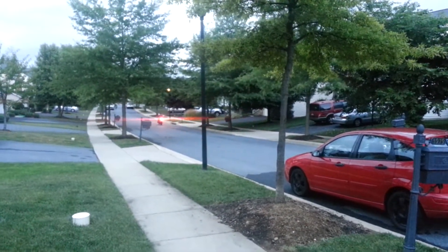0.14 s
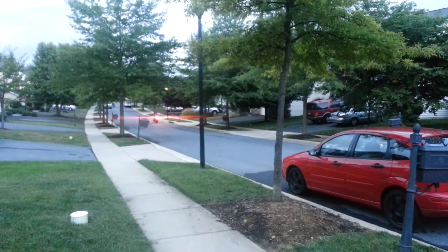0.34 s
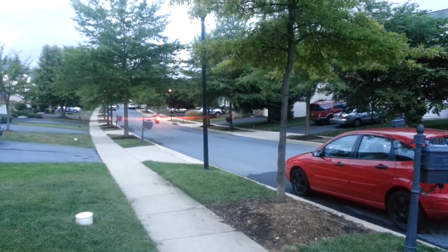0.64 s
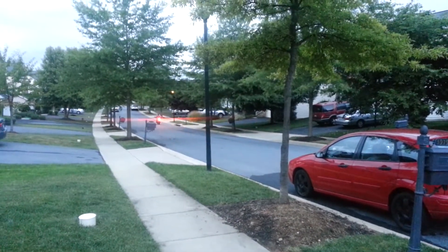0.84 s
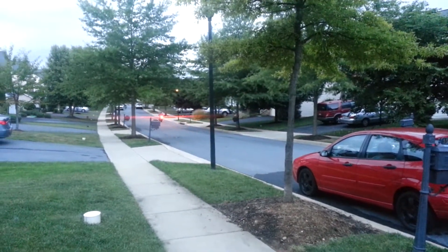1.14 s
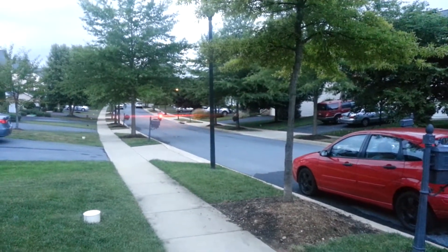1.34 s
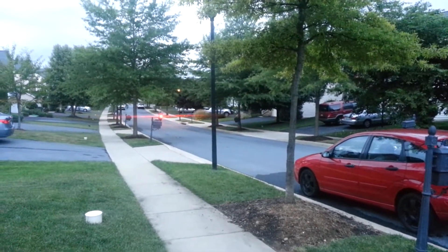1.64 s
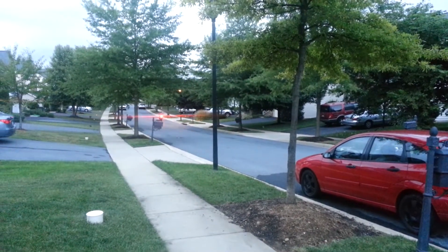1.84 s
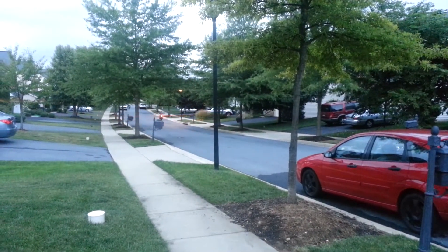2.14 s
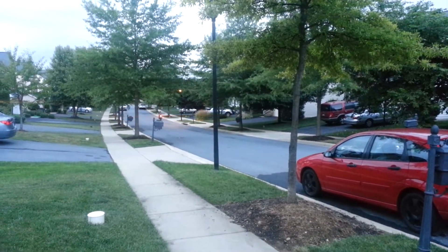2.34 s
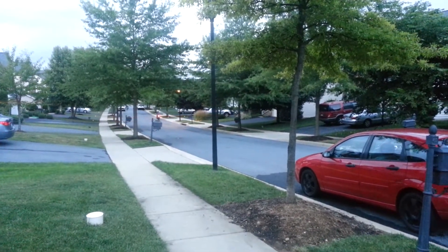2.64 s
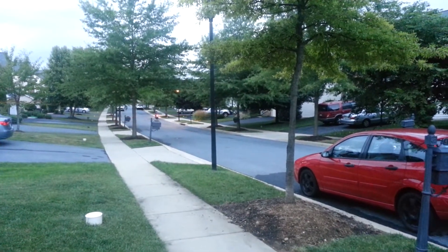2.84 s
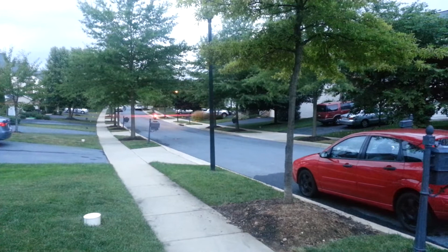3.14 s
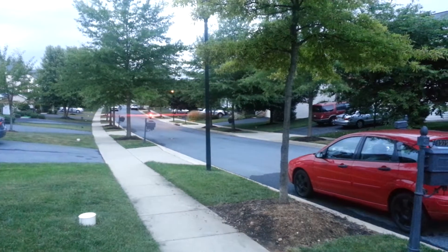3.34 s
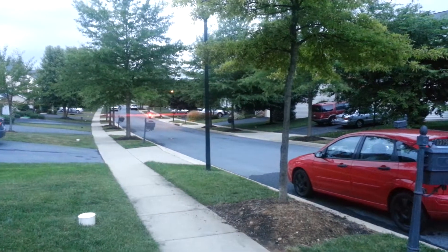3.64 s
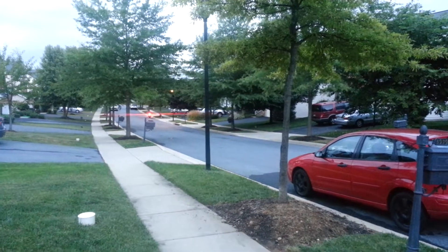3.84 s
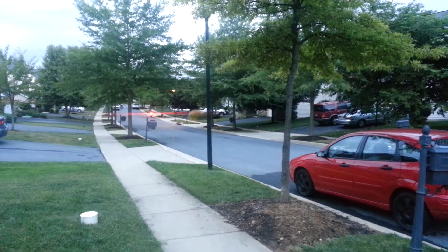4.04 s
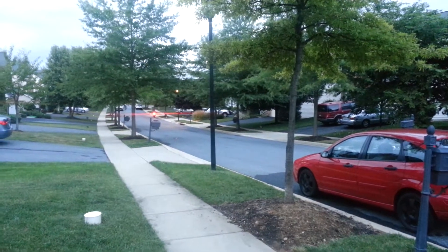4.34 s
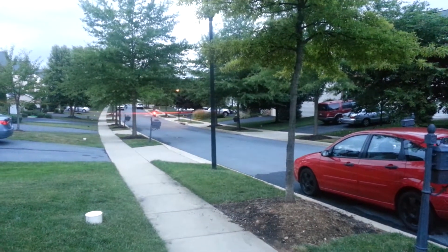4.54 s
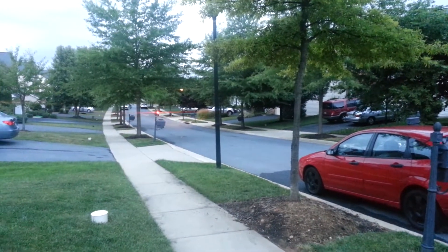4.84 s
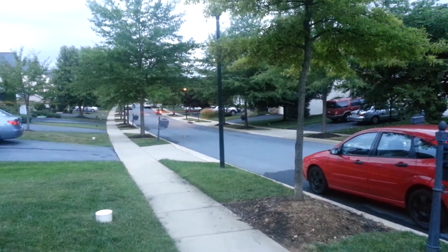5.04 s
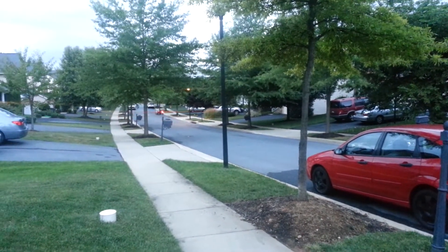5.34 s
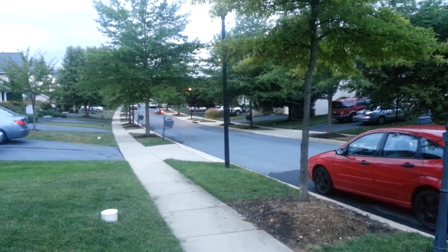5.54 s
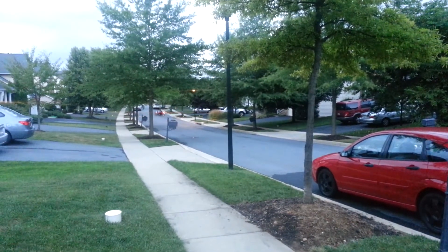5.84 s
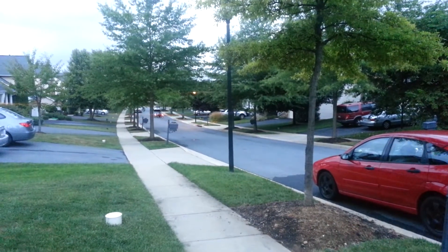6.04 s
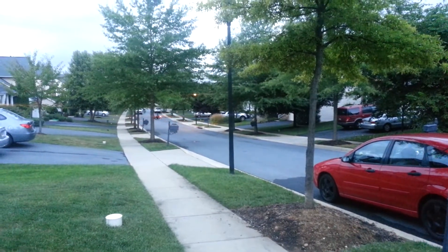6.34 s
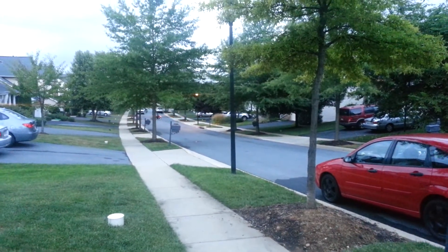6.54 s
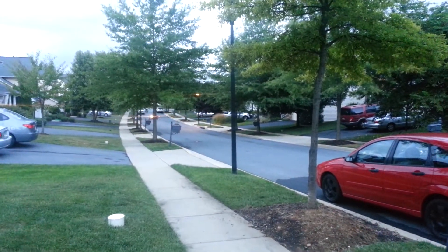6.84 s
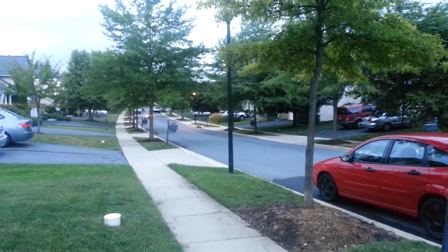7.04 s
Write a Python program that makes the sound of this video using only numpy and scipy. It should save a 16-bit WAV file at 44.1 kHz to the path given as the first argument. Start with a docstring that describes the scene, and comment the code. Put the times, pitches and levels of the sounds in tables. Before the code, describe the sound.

A motorcycle down a quiet street putters and slows, backfires once early on, then is blipped hard with sharp cracking pops over faint insects.

```python
"""Revved V-twin in a quiet street

A motorcycle some way down the street is revved, coasts down and is blipped again; it backfires once.
Pulse excitation of resonators makes each engine cycle: a crack from the front pipe, a thump from the rear
pipe and a snap just before it. Shaped noise makes the roar of gas. House fronts return echoes and a
diffuse tail; narrow-band noise makes insects shrill near 6 kHz, over a low street hum with faint tones."""
import sys
import numpy as np
from scipy import signal
from scipy.io import wavfile
from scipy.ndimage import uniform_filter1d

SR = 44100
rng = np.random.default_rng(int(sys.argv[2]) if len(sys.argv) > 2 else 0)


def digitize_waveform(pressure):
    """Quantize a signal to 16-bit integers and store it at the path in sys.argv[1].

    Rows of a 2-D input are taken as channels; values are limited to [-1, 1].
    """
    field = np.atleast_2d(pressure).T
    bounded = np.clip(field, -1, 1)
    quanta = np.round(bounded * 32767).astype(np.int16)
    wavfile.write(sys.argv[1], SR, quanta)


N = 317079

# Brightness is a slope counted from the lowest resonance of a set; widths are those of one resonator pass.
# engine speed, sagging while it coasts: (time [s], speed [engine cycles per s])
SPEED = [(0.0, 22.333), (.45, 20.58), (.55, 20.54), (.65, 19.8), (1.12, 17.976), (1.73, 14.024),
         (1.87, 16.197), (2.08, 21.724), (2.13, 20.359), (3.24, 18.669), (3.7, 13.807), (4.08, 13.02),
         (4.18, 13.3), (4.29, 12.85), (4.4, 13.9), (4.44, 15.75), (4.52, 15.031), (4.65, 23.318),
         (4.93, 22.316), (5.62, 14.644), (5.67, 18.715), (5.83, 15.2), (6.34, 19.652), (6.79, 14.993),
         (6.92, 19.721), (7.2, 19.142)]
# engine load between the blips:
# (time [s], front crack [dB], snap [dB], thump [dB], crack brightness [dB per octave])
ENGINE_LOAD = [(0, -16.5, -24, -31, -3), (.48, -17, -24, -32.5, -4), (1.1, -21, -27, -33.5, -5),
               (1.55, -28.5, -31.5, -39, -2.5), (1.8, -27, -27.5, -40, -4.5), (1.97, -26, -24.5, -32, -3.5),
               (2.03, -18, -28, -33, -5), (2.4, -18.5, -29.5, -34.5, -3.5), (3.24, -22, -27.5, -35, -5),
               (3.5, -27, -31, -38.5, -2), (3.75, -38.5, -34.5, -44, -1), (4.36, -34.5, -30.5, -44, -3),
               (4.41, -30, -47, -43, -14), (4.75, -15, -56, -37.5, -5.5), (5.15, -22, -48, -36.5, -3),
               (5.6, -38.5, -40, -41, 0.5), (5.85, -42, -37.5, -45.5, -1), (6.25, -31.5, -36, -38.5, -1.5),
               (6.6, -28.5, -35, -41.5, -7), (6.8, -35.5, -39, -44, -1), (7.19, -27.5, -34, -40, -3.5)]
# blips of the throttle: (opening time [s], shutting time [s], thump level [dB])
BLIPS = [(4.567, 4.652, -26), (5.717, 5.766, -34), (6.106, 6.173, -31.5), (6.89, 6.978, -34)]
# hard pops of the front pipe, and one weak firing after the big blip:
# (time [s], level [dB], brightness [dB per octave], favoured ring [Hz], its lift [dB])
POPS = [(4.484, -15.5, -5, 1500, -3), (4.5492, -7, -2, 2500, 6.5), (4.6019, -3.5, -7, 3780, 12),
        (4.6486, -5.5, -3.5, 2680, 4), (4.692, -11, -11, 1500, 4), (4.78, -32, -17, 800, 2),
        (4.823, -13, -2, 4300, -2), (5.725, -24.5, 0, 1500, 4.5), (5.783, -26, -1, 800, 2.5),
        (6.091, -24, -2, 1500, 4), (6.1518, -17, -1, 3550, 6), (6.2026, -22, -4, 1500, 4),
        (6.699, -29, 0, 2390, 10), (6.8851, -20, -1, 2700, 5.5), (6.94, -17, -1, 4000, 4)]
# crackles of the rear pipe between the pops: columns as for the pops
CRACKLES = [(4.4555, -31, -1, 4200, 9), (4.526, -29, 0.5, 3700, 18), (4.582, -17, -14, 4300, 7),
            (4.5895, -25, -16, 800, 0), (4.631, -17, -3, 3700, -2), (4.675, -29, -7, 800, -4),
            (5.701, -43, 3, 4280, 8), (5.7605, -38, -1, 2600, 17), (6.0668, -30, -3, 2500, 15),
            (6.1275, -30, -1, 2500, 10), (6.182, -24, -4.5, 2100, 7), (6.861, -36, -1, 2600, 7),
            (6.917, -27, -1.5, 3900, 10)]
# exhaust pipe resonances of the cracks: (frequency [Hz], width [Hz], level [dB])
PIPE_MODES = [(825, 350, -3.5), (1474, 480, -5), (2089, 240, -9), (2600, 576, -8), (3616, 410, -12),
              (4280, 230, -14.5), (5940, 1700, -9), (7970, 2000, -12)]
# muffler body resonances of the thump: (frequency [Hz], width [Hz], level [dB])
MUFFLER_MODES = [(116.6, 86, -3), (128.2, 129, 2), (316, 215, -4.5), (197, 162, -10.5)]
# short low push of a pop or the backfire: (frequency [Hz], width [Hz], level [dB])
PUSH_MODES = [(281, 159, -4)]
# ring that the running engine's cracks favour: (frequency [Hz], lift [dB])
TICK = (4350, 4)
# the backfire: (time [s], level [dB])
BACKFIRE = (0.4276, 7.1)
# how the backfire favours each pipe resonance in turn: (lift [dB])
BANG_COLOUR = [2, 6, -18, 7, -8, 7, -8, 7]
# spectrum of the bang rolling down the street: (frequency [Hz], relative level [dB per Hz])
BANG_ROLL = [(88, -7), (150, -7.5), (327, -7), (359, -5), (410, -5), (545, -20), (782, -8.5), (1260, -20),
             (1490, -12), (1740, -20.5), (2350, -11.5), (2840, -25.5), (4320, -17), (5220, -26.5),
             (14000, -45)]
# decay of that roll: (frequency [Hz], time to fall 60 dB [s])
BANG_ROLL_T60 = [(300, 0.71), (1500, 1), (4000, 0.53), (10000, 0.46)]
# spectrum of the gas roar: (frequency [Hz], relative level [dB per Hz])
ROAR = [(200, -1), (350, 2), (800, 0), (1200, -7), (2400, -9.5), (3200, -20.5), (6000, -23.5),
        (12000, -107)]
# duller reflection off the road: (delay [s], level [dB], low-pass corner [Hz])
ROAD_BOUNCE = (0.001239, -10, 8100)
# house fronts: (delay [s], level [dB])
ECHOES = [(.0087, -26), (0.019, -18), (0.041, -23)]
# diffuse answer of the street:
# (frequency [Hz], time to fall 60 dB [s], level [dB], left-right likeness [0 to 1])
STREET = [(119, 0.26, -5.5, 0.99), (323, 0.6, -7, 0.96), (860, 1, -16.5, 0.2), (1550, 1, -7, 0.03),
          (2570, 0.59, -6, 0.14), (4300, 0.51, 0, .1), (6400, 0.82, -1, 0.066), (8300, 0.38, 0, 0.041),
          (10000, 0.49, 8, 0.035)]
# spectrum of street hum and hiss: (frequency [Hz], relative level [dB per Hz])
HUM = [(18, -48), (30, -69), (80, -2), (150, -3.5), (401, -15.5), (786, -16), (1190, -22.5), (2460, -23.5),
       (2950, -25), (3720, -27), (5210, -35.5), (5930, -45), (6930, -36.5), (14700, -38)]
# stereo likeness of the hum: (frequency [Hz], left-right likeness [0 to 1])
HUM_LIKENESS = [(100, 1), (600, 0.54), (1500, 0.014), (4000, 0.026), (9000, 0.052)]
# stereo balance of the hum: (frequency [Hz], left minus right [dB])
HUM_BALANCE = [(60, -0.5), (150, 0), (380, 1), (940, 0.5), (2350, 3), (5870, -11), (14700, 5.5)]
# faint low tones: (frequency [Hz], spread of pitch wander [Hz], mean level [dB])
HUM_TONES = [(160, 1.5, -59), (233.5, 0.3, -50.5)]
# insect chorus: (frequency [Hz], width [Hz], mean level before stereo balance [dB])
INSECTS = [(6037, 460, -57.5), (4290, 820, -63)]

# crank position at the start [cycles]; the front cylinder fires on whole numbers
FIRST_CYCLE, REAR_PLACE = -0.255, 405 / 720   # the rear cylinder's share of a cycle after the front
PULSE_LEAD_S = 0.0014   # the shock starts this long before the firing time
# both against the rear firing: the rear crack comes later, the snap earlier
REAR_LAG_S, SNAP_LEAD_S = 0.00425, 0.0068
FRONT_THUMP_LEAD_S, REAR_THUMP_LEAD_S = 0.0019, 0.002   # each thump against its crack or snap
UNEVEN_DB, SNAP_BITE = 1.0, 1.36   # cycle-to-cycle scatter; added snap brightness [dB per octave]
# rear crack: against the front crack; in a blip against the thump, earlier and stopping fast
REAR_UNDER_DB, REAR_BLIP_DB, REAR_LEAD_S, REAR_FALL_DB_PER_S = -27, -11, 0.049, 198
BLIP_RISE_DB_PER_S, BLIP_FALL_DB_PER_S = 227, 93
BLIP_THUMP_BITE = 0.42   # the thump moves up as a blip lifts it [dB per octave for each dB]
FRONT_THUMP_DB, REAR_THUMP_DB, SNAP_THUMP_DB = 7, 6.5, 2.5   # low pushes over the thump level
POP_THUMP_DB = -4.5   # low push of a pop against its crack
BLAST_S, SHOCK_HZ, JET_HZ = 0.0012, 1170, 1500   # jet rise time, shock softening, jet high-pass corner
ROUGH, BANG_ROUGH = 0.61, 0.3   # turbulence against the shock: cracks, backfire
FAVOUR_OCTAVES = 0.22   # half-width of a favoured-ring lift, at 1/e
PITCH_WOBBLE = 0.05   # share by which each pulse may shift a resonance up or down
# bare shock front of the backfire against its crack, and its band
BANG_SHOCK_DB, BANG_LOW_HZ, BANG_HIGH_HZ = -24, 6500, 9000
BANG_BITE, BANG_THUMP_DB = -0.05, -22.5   # brightness [dB per octave]; low push against the crack
BANG_PITCH, BANG_LATE_S = 0.95, 0.0008   # low rings lie lower (ratio); upper rings follow the lowest
BANG_ROLL_DB, ROLL_GRAIN_DB = -33.5, 0.8   # roll level; spread of its grain
ROAR_DB, HUM_DB = -11, -45.5   # roar over the thump level; hum rms
LEFT_LAG_S = 0.00006
MIC_CUT_HZ, CUTOFF_HZ, KNEE = 67.7, 15200, 5   # bass corner, top cut, sharpness of the overload


def engine():
    """Superposition: rear thumps against front and snap thumps of opposite sign, and the cracks."""
    firings = firing_times()
    t, front_db, snap_db, load_db, bite = np.transpose(ENGINE_LOAD)
    front_db, snap_db, load_db, bite = [np.interp(firings, t, c) for c in (front_db, snap_db, load_db, bite)]
    front_uneven, snap_uneven, rear_uneven = UNEVEN_DB * rng.normal(0, 1, (3, len(firings)))
    rear_blip_db = REAR_BLIP_DB + blips_db(firings, REAR_LEAD_S, REAR_FALL_DB_PER_S)
    rear_db = np.maximum(front_db + REAR_UNDER_DB + rear_uneven, rear_blip_db)
    front_db, snap_db = front_db + front_uneven, snap_db + snap_uneven

    front, popped = firings.copy(), np.zeros(len(firings), bool)
    for pop_s, *_ in POPS:   # a pop takes the place of the nearest firing
        k = np.argmin(abs(front - pop_s))
        front[k], popped[k] = pop_s, True
    front = front - PULSE_LEAD_S
    rear = front + REAR_PLACE * np.diff(front, append=2 * front[-1] - front[-2])
    snap, rear = rear - SNAP_LEAD_S, rear + REAR_LAG_S

    crack_times = np.r_[front[~popped], snap, rear]
    crack_db = np.r_[front_db[~popped], snap_db, rear_db]
    crack_bite = np.r_[bite[~popped], bite + SNAP_BITE, bite]
    cracks = struck(crack_times, crack_db, PIPE_MODES, spread_db=1.4, rough=ROUGH,
                    bite=crack_bite, favour=TICK, wobble=PITCH_WOBBLE)

    thump_db = thump_level(firings)
    rise = BLIP_THUMP_BITE * (thump_db - load_db)
    thump_db = thump_db - rise
    rear_thump = struck(rear - REAR_THUMP_LEAD_S, thump_db + REAR_THUMP_DB, MUFFLER_MODES,
                        spread_db=1.0, rough=0.017, bite=rise, wobble=PITCH_WOBBLE)
    other_times = np.r_[front - FRONT_THUMP_LEAD_S, snap - REAR_THUMP_LEAD_S]
    other_db = np.r_[thump_db + FRONT_THUMP_DB, thump_db + SNAP_THUMP_DB]
    other_thumps = struck(other_times, other_db, MUFFLER_MODES,
                          spread_db=0.7, rough=0.03, bite=np.r_[rise, rise])
    pop_cracks, pop_pushes = pops_and_crackles()
    return rear_thump - other_thumps - pop_pushes - off_road(cracks + pop_cracks)


def firing_times():
    """Phase integration: speed sums to crank position; the front cylinder fires at each whole cycle."""
    margin = SR // 10   # samples before and after the scene
    s = np.arange(-margin, N + margin) / SR
    cycles = np.cumsum(np.interp(s, *np.transpose(SPEED))) / SR
    cycles = cycles - cycles[margin] + FIRST_CYCLE
    return np.interp(np.arange(np.ceil(cycles[0]), cycles[-1]), cycles, s)


def pops_and_crackles():
    """Impulsive excitation of the pipe: each burst favours one ring; the pops add a low push."""
    s, db, bright, *favour = np.transpose(POPS + CRACKLES)
    cracks = struck(s - PULSE_LEAD_S, db, PIPE_MODES, spread_db=0.5, rough=ROUGH, bite=bright, favour=favour)
    s, db, *_ = np.transpose(POPS)
    pushes = struck(s - PULSE_LEAD_S, db + POP_THUMP_DB, PUSH_MODES, spread_db=1.0, rough=0)
    return cracks, pushes


def thump_level(t):
    """Envelope maximum: thump level [dB] follows the load, lifted by the blips."""
    s, *_, thump_db, _ = np.transpose(ENGINE_LOAD)
    return np.maximum(np.interp(t, s, thump_db), blips_db(t, lead_s=0, fall_db_per_s=BLIP_FALL_DB_PER_S))


def blips_db(t, lead_s, fall_db_per_s):
    """Exponential attack and decay: the loudest blip rises steeply, holds while open, then falls."""
    levels = []
    for opens, shuts, db in BLIPS:
        before = np.maximum(opens - lead_s - t, 0)
        after = np.maximum(t - shuts + lead_s, 0)
        levels.append(db - BLIP_RISE_DB_PER_S * before - fall_db_per_s * after)
    return np.max(levels, axis=0)


def struck(times, db, modes, spread_db, rough, bite=0, favour=(1000, 0), wobble=0):
    """Modal excitation: a soft shock and a turbulent jet ring each mode, varied from pulse to pulse."""
    at = np.round(np.asarray(times) * SR).astype(int)
    keep = (at >= 0) & (at < N)
    chance = rng.normal(0, 1, (len(at), len(modes)))
    pitch_shift = rng.integers(-1, 2, (len(at), len(modes)))
    r, soft = np.exp(-1 / (BLAST_S * SR)), np.exp(-2 * np.pi * SHOCK_HZ / SR)
    hiss = filtered(rng.standard_normal((2, N)), 2, JET_HZ, "high")
    turbulence = rough * 2 * (1 - r) ** (3 / 2) * hiss
    out = np.zeros(N)
    for k, (hz, width_hz, level_db) in enumerate(modes):
        octaves = np.log2(hz / modes[0][0])
        lift_db = favour[1] * np.exp(-(np.log2(hz / favour[0]) / FAVOUR_OCTAVES) ** 2)
        scatter_db = spread_db * (1 + octaves / 3) * chance[:, k]   # high rings scatter more
        sizes = from_db(db + level_db + bite * octaves + lift_db + scatter_db)
        for shift in (-1, 0, 1) if wobble else (0,):
            mine = keep & (pitch_shift[:, k] == shift) if wobble else keep
            clicks = np.full(N, 1e-18)   # the floor avoids vanishingly small numbers
            clicks[at[mine]] = sizes[mine]
            shock = signal.lfilter([1 - soft], [1, -soft], clicks)
            # the jet swells and dies: the treble comes late
            jet = turbulence[k % 2] * signal.lfilter([1], [1, -2 * r, r * r], clicks)
            # two passes: the ring swells, then dies, with height about 1
            height, ring_hz = 2 * np.pi * np.e * width_hz / SR, hz * (1 + shift * wobble)
            ring = resonate_twice(shock + jet, ring_hz, width_hz)
            out += (-1) ** k * height * ring   # neighbouring modes have opposite sign
    return out


def off_road(x):
    """Specular reflection: direct sound and its delayed, duller bounce off the road."""
    delay_s, db, cut_hz = ROAD_BOUNCE
    bounce = filtered(delayed(x, delay_s), 1, cut_hz, "low")
    return (x + from_db(db) * bounce) / (1 + from_db(db))


def backfire():
    """Impulsive combustion: unburnt fuel cracks in the pipe with a bare shock, a push and a diffuse roll."""
    s, db = BACKFIRE
    click = 1.0 * (np.arange(N) == int(s * SR))
    shock = filtered(from_db(db + BANG_SHOCK_DB) * click + 1e-18, 2, [BANG_LOW_HZ, BANG_HIGH_HZ], "band")
    rings = []
    for (hz, width_hz, level_db), lift_db in zip(PIPE_MODES, BANG_COLOUR):
        ring_hz = hz * (BANG_PITCH if hz < 2000 else 1)
        rings.append((ring_hz, width_hz, level_db + lift_db))
    lowest = struck([s], db, rings[:1], spread_db=0.2, rough=0)
    upper = struck([s + BANG_LATE_S], db, rings[1:], spread_db=0.2, rough=BANG_ROUGH, bite=BANG_BITE)
    push = struck([s], db + BANG_THUMP_DB, PUSH_MODES, spread_db=0.3, rough=0)
    bang = push + off_road(shock - lowest - upper)
    roll = rms_one(scatter(lambda hz: (at_hz(BANG_ROLL_T60, hz), at_hz(BANG_ROLL, hz)), step=0.25))
    roll = roll * from_db(ROLL_GRAIN_DB * drift(50)[:roll.shape[1]])   # single walls stand out
    return walls(bang) + from_db(BANG_ROLL_DB) * signal.fftconvolve(click[None], roll, axes=1)[:, :N]


def roar():
    """Flow noise: intake and gas flow between the pulses, a wash that follows the engine's load."""
    white = rng.standard_normal((2, 2, N))
    wash = 0
    for k, (hz, sos) in enumerate(octave_bands(step=0.4945)):
        if hz > 150:
            wash = wash + from_db(at_hz(ROAR, hz)) * signal.sosfilt(sos, white[k % 2])
    mid, side = wash
    side = filtered(side, 2, 900, "high")   # the bass is the same in both ears
    level_db = uniform_filter1d(thump_level(np.arange(N) / SR), size=4000)
    return from_db(level_db + ROAR_DB) * rms_one(mid + side * [[1], [-1]])


def street(x):
    """Reverberation: direct sound and wall echoes, with a diffuse tail by convolution."""
    columns = np.array(STREET)
    tail = scatter(lambda hz: [at_hz(columns[:, [0, c]], hz) for c in (1, 2)], step=0.5016)
    return walls(x) + signal.fftconvolve(x[None], tail, axes=1)[:, :N]


def walls(x):
    """Discrete reflection: direct sound and a few house-front echoes."""
    return x + sum(from_db(db) * delayed(x, delay_s) for delay_s, db in ECHOES)


def scatter(decay_and_db, step):
    """Diffuse response to a click: noise dies exponentially band by band, unlike in the two ears."""
    t = np.arange(int(0.7 * SR)) / SR
    white, tail = rng.standard_normal((2, 2, len(t))), 0
    for k, (hz, sos) in enumerate(octave_bands(step)):
        t60, db = decay_and_db(hz)
        alike = at_hz(np.array(STREET)[:, [0, 3]], hz)
        mid, side = signal.sosfilt(sos, white[k % 2])
        size = from_db(db) * np.sqrt(np.log(1000) / (t60 * SR))   # makes band energy independent of t60
        tail = tail + size * two_ears(mid, side, alike) * from_db(-60 * t / t60)
    return tail * (1 - np.exp(-(t / 0.0091) ** 2))   # it builds up as more walls answer


def hum():
    """Filtered noise: half-octave bands with partial stereo correlation and slight flicker."""
    out, white = 0, rng.standard_normal((2, 2, N))
    for k, (hz, sos) in enumerate(octave_bands(step=0.5054)):
        mid, side = signal.sosfilt(sos, white[k % 2])
        flicker_db = 1.2 * drift(20)
        balance_db = at_hz(HUM_BALANCE, hz) * np.array([[0.5], [-0.5]])
        gain = from_db(at_hz(HUM, hz) + flicker_db + balance_db)
        out = out + gain * two_ears(mid, side, at_hz(HUM_LIKENESS, hz))
    return from_db(HUM_DB) * rms_one(out)


def hum_tones():
    """Frequency and amplitude modulation: low sine tones wander slightly in pitch and level."""
    out = 0
    for hz, wander_hz, db in HUM_TONES:
        gain = from_db(db + 1.5 * drift(2.8)) * np.sqrt(2)
        phase = 2 * np.pi * np.cumsum(hz + wander_hz * drift(3.45)) / SR
        out = out + gain * np.sin(phase)
    return out


def insects():
    """Narrow-band noise: resonances turn noise into a distant, wavering chorus, louder on the right."""
    out = 0
    for hz, width_hz, db in INSECTS:
        band = resonate_twice(rng.standard_normal((2, N)), hz, width_hz)
        gain = from_db(db + 0.54 * drift(5.5) + 0.46 * drift(57))
        out = out + gain * rms_one(band) * from_db([[-2.2], [2.2]])
    return out


def from_db(db):
    """Logarithmic level: decibels to amplitude gain."""
    return 10 ** (np.asarray(db) / 20)


def rms_one(x):
    """Normalisation: scaled to rms 1."""
    return x / np.sqrt(np.mean(x ** 2) + 1e-20)


def at_hz(points, hz):
    """Interpolation: a spectrum table read on a log-frequency axis."""
    table_hz, values = np.transpose(points)
    return np.interp(np.log(hz), np.log(table_hz), values)


def filtered(x, order, cut_hz, kind):
    """Maximally flat filtering: a Butterworth low-, high- or band-pass."""
    return signal.sosfilt(signal.butter(order, cut_hz, kind, fs=SR, output="sos"), x)


def delayed(x, delay_s):
    """Propagation delay: fractions of a sample by linear interpolation."""
    return np.interp(np.arange(N) - delay_s * SR, np.arange(N), x)


def two_ears(mid, side, alike):
    """Interaural correlation: independent noises mix to left and right with the given likeness."""
    return np.sqrt(1 + alike) * mid + np.sqrt(1 - alike) * side * [[1], [-1]]


def drift(rate_hz):
    """Low-passed random process: noise through two equal poles at rate_hz, with spread 1."""
    hop = 40   # samples between slow values
    r = np.exp(-2 * np.pi * rate_hz * hop / SR)
    noise = rng.standard_normal(N // hop + 2002)
    slow = signal.lfilter([1], [1, -2 * r, r * r], noise)[2000:]   # past the settling
    return np.interp(np.arange(N) / hop, np.arange(len(slow)), rms_one(slow))


def resonate(x, hz, width_hz):
    """Damped oscillation: a two-pole resonance; a unit click rings with height about 1."""
    r, w = np.exp(-np.pi * width_hz / SR), 2 * np.pi * hz / SR
    return signal.lfilter([np.sin(w)], [1, -2 * r * np.cos(w), r * r], x + 1e-18)


def resonate_twice(x, hz, width_hz):
    """Cascaded resonance: the second pass makes the ring swell before it decays."""
    return resonate(resonate(x, hz, width_hz), hz, width_hz)


def octave_bands(step):
    """Constant-ratio filter bank: centres and band-passes, step octaves wide, from bass to top."""
    edges = np.minimum(30 * 2 ** np.arange(0, 9.1, step), 16000)
    return [(np.sqrt(low * high), signal.butter(2, [low, high], "band", fs=SR, output="sos"))
            for low, high in zip(edges, edges[1:])]


def scene():
    """Superposition: the motorcycle heard through the street, over hum and insects."""
    left, right = street(engine()) + backfire()
    left = delayed(left, LEFT_LAG_S)
    return np.array([left, right]) + roar() + hum() + hum_tones() + insects()


def record(dry):
    """Transducer limits: bass roll-off of small microphones, hard overload, steep top cut."""
    x = filtered(dry, 6, MIC_CUT_HZ, "high")
    overloaded = np.clip(1.05 * x / (1 + abs(x) ** KNEE) ** (1 / KNEE), -1, 1)
    return signal.sosfilt(signal.cheby2(24, 80, CUTOFF_HZ, fs=SR, output="sos"), overloaded)


dry = scene()
out = record(dry)
digitize_waveform(out)
```